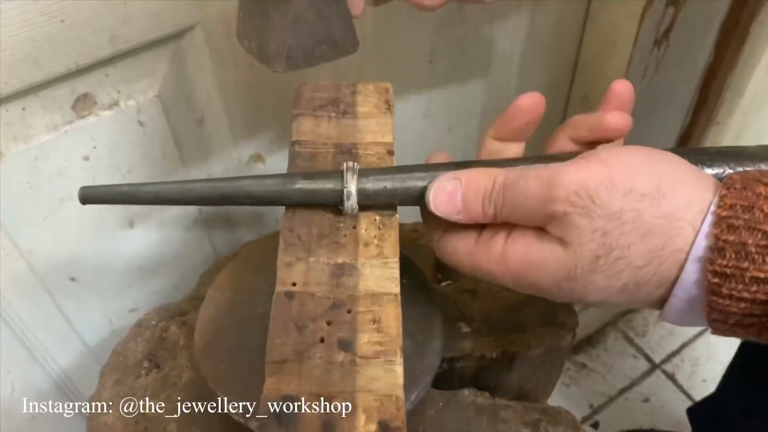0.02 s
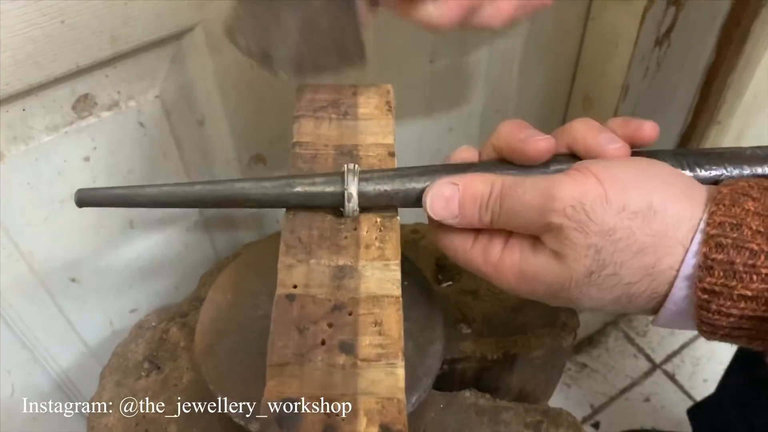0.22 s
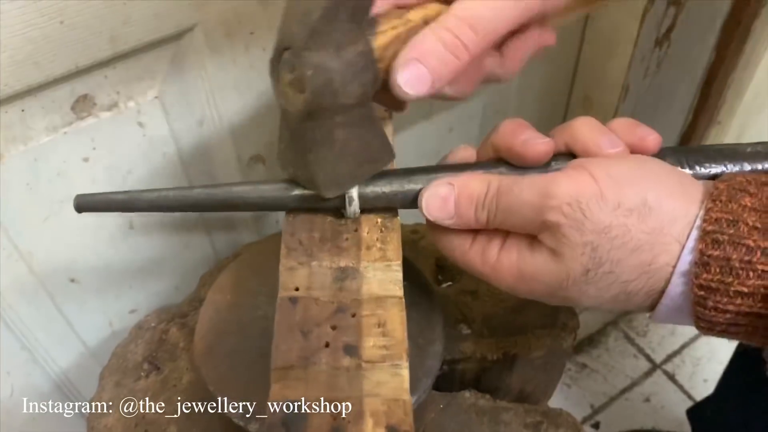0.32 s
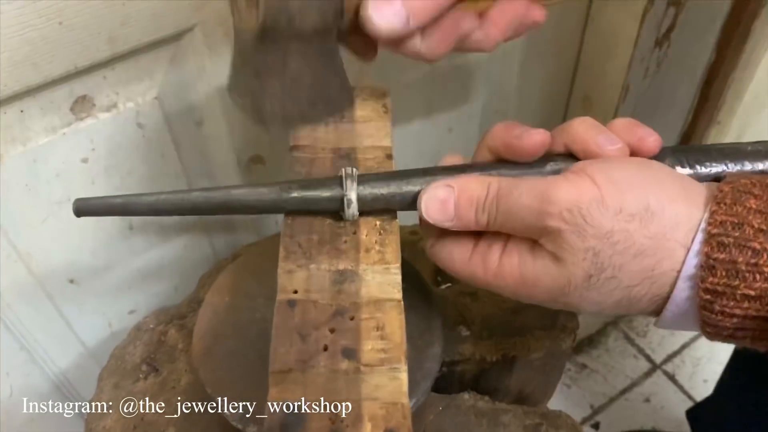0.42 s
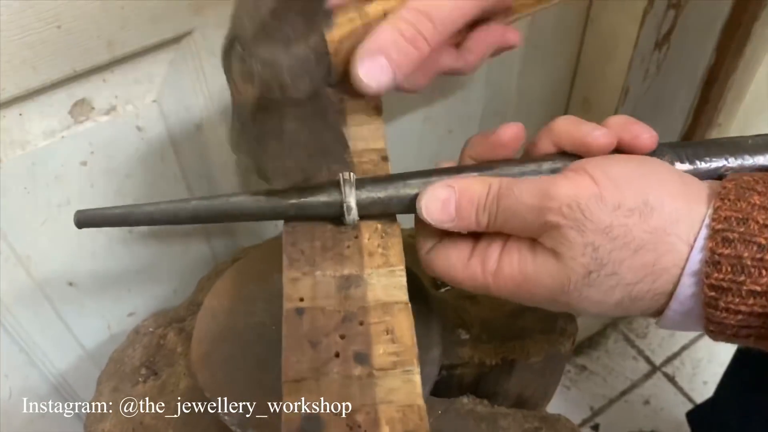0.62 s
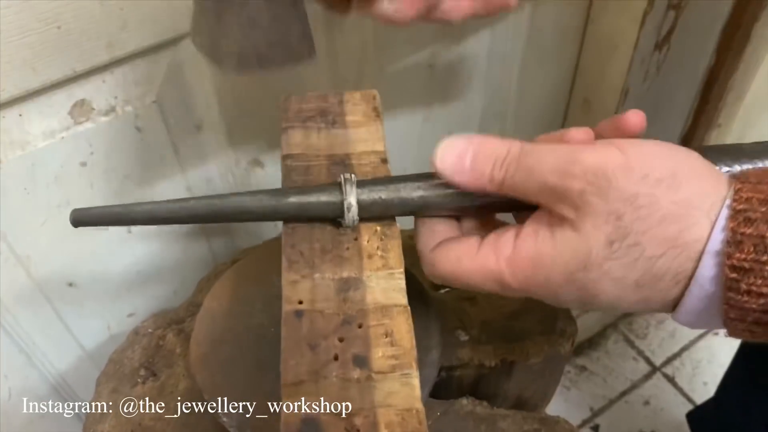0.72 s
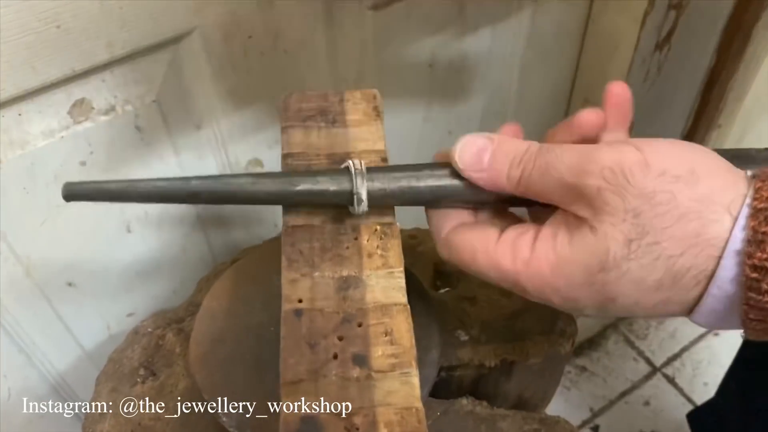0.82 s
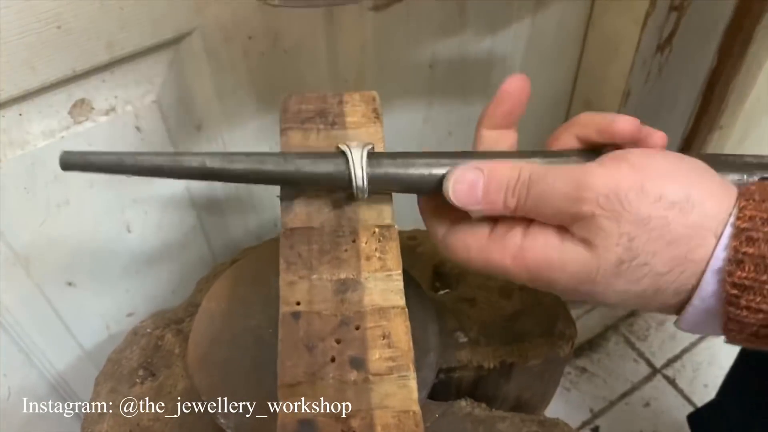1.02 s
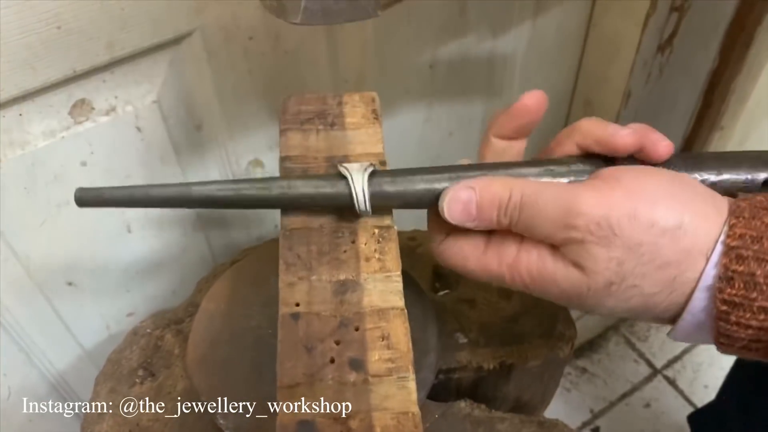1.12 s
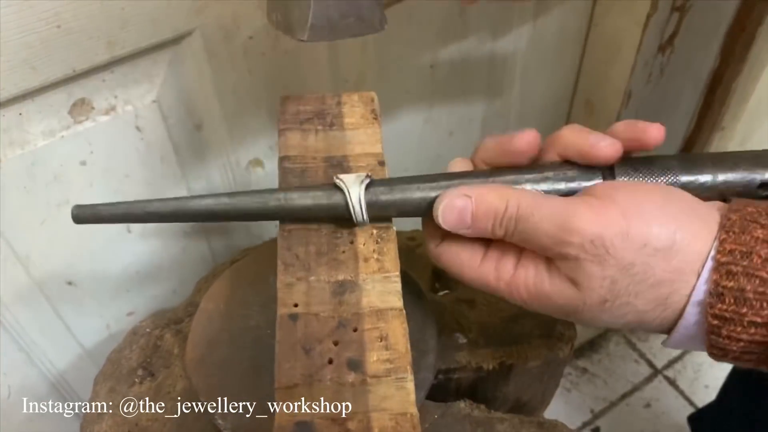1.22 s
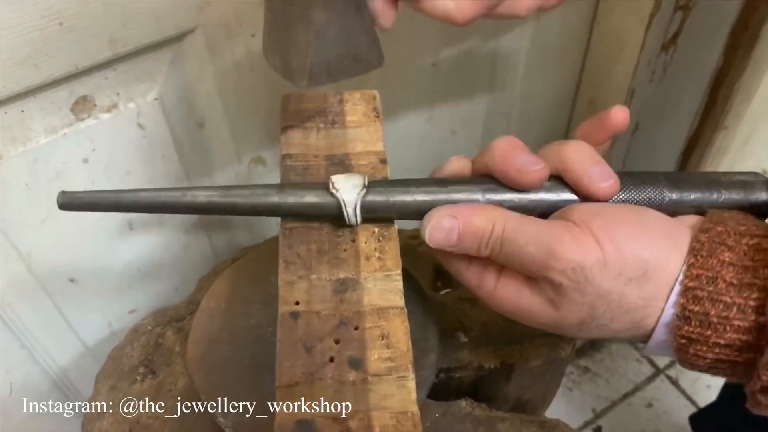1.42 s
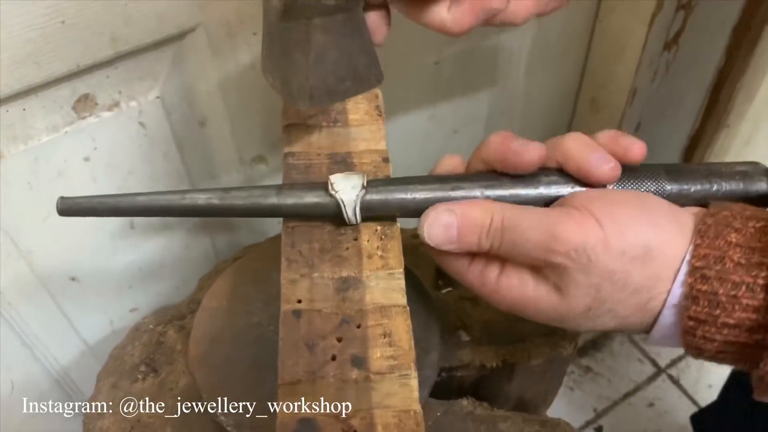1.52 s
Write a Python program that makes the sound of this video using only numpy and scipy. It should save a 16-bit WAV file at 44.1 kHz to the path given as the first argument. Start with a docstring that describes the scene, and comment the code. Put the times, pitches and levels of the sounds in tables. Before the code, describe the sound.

A hammer cracks twice on a steel ring mandrel, followed by dull wooden knocks and rubs

```python
"""A small workshop, heard close in the stereo sound of a phone: a steel hammer strikes a ring on a steel mandrel
that rests on a wooden bench peg. Two blows, the first with a weaker second contact, each sum a noise crack,
decaying steel tones, a peg knock of sinking pitch, a bench boom and a diffuse noise tail of the room.
Then the mandrel is turned and set down: soft knocks of thud, ring and rattle, and dull rubs of shaped noise.
A hand rustles faintly near the end; a low, gently swaying noise of the room runs throughout."""
import sys
import numpy as np
from scipy import signal
from scipy.fft import rfft, irfft, next_fast_len
from scipy.io import wavfile
from scipy.ndimage import map_coordinates

SR = 44100
rng = np.random.default_rng(int(sys.argv[2]) if len(sys.argv) > 2 else 0)


def transcribe(u):
    """Save the signal u as a 16-bit wav file named by the first command-line argument.

    u: samples, shape (n,) or (channels, n), limited to [-1, 1]; the rate is SR.
    q: integer samples, one column per channel.
    """
    v = np.clip(np.atleast_2d(u).T, -1, 1)
    q = np.round(v * 32767).astype(np.int16)
    wavfile.write(sys.argv[1], SR, q)


N = 68355
T = np.arange(int(.9 * SR)) / SR  # time within one sound event [s]


def amp(db):
    """Decibels to gain."""
    return 10 ** (np.asarray(db) / 20)


def along(points, hz):
    """Read (frequency, value) points at hz, in straight lines on a log-frequency axis."""
    point_hz, values = np.transpose(points)
    return np.interp(np.log(hz + 1), np.log(point_hz + 1), values)


def decay(t60, time):
    """Exponential decay by 60 dB in t60 seconds."""
    return np.exp(-np.log(1000) * time / t60)


def rise(rise_s):
    """Exponential approach to 1 with time constant rise_s."""
    return 1 - np.exp(-T / rise_s)


def fade(t60, rise_s):
    """Envelope of a struck body: a quick rise times an exponential decay."""
    return decay(t60, T) * rise(rise_s)


def add(out, start_s, sound):
    """Mix sound into out from start_s, cut at the end of the scene."""
    i = round(start_s * SR)
    out[:, i:i + sound.shape[-1]] += sound[..., :N - i]


def wobble(rate, size):
    """A smooth random curve through rate random knots a second."""
    knots = rng.standard_normal(1024)
    return map_coordinates(knots, [np.arange(size) * rate / SR + 2], mode="wrap")


def filtered(x, response):
    """Multiply the spectrum of x by a complex response of frequency."""
    n = x.shape[-1]
    padded = next_fast_len(n + 8192)
    hz = np.fft.rfftfreq(padded, 1 / SR)
    return irfft(rfft(x, padded) * response(hz), padded)[..., :n]


# Likeness of the two channels: (frequency [Hz], left-right correlation [-1 to 1])
CHANNEL_LIKENESS = [(100, .96), (300, 0.63), (500, 0.78), (1000, 0.53), (1400, -0.42), (2300, 0.13),
                    (4000, -0.081), (6000, 0.057), (8000, 1), (15000, 1)]


def spread(hz):
    """Mid and side shares that give the channels their likeness at each frequency."""
    turn = np.arccos(np.clip(along(CHANNEL_LIKENESS, hz), -1, 1)) / 2
    return np.array([np.cos(turn), np.sin(turn)])


def left_right(mid, side):
    """Sum and difference of mid and side make the left and right channels."""
    return np.array([mid + side, mid - side])


def noise(spectrum, size):
    """Stereo noise coloured by a spectrum and scaled to rms 1 over both channels."""
    white = rng.standard_normal((2, size))
    mid, side = filtered(white, lambda hz: amp(along(spectrum, hz)) * spread(hz))
    pair = left_right(mid, side)
    return pair / pair.std()


# Colour of the room noise: (frequency [Hz], relative level [dB per Hz])
FLOOR_COLOUR = [(25, -17), (50, -15.5), (72, -6), (100, 3.5), (140, -11.5), (190, -4), (245, -20.5),
                (320, -16.5), (500, -25.5), (850, -21), (1500, -25.5), (4000, -29.5), (8700, -31.5),
                (10000, -37), (12000, -43), (14000, -39.5), (16000, -52.5)]
FLOOR_DB, FLOOR_SWAY_DB = -68, 3.5  # the sway scales a random curve


def background():
    """Low rush of the workshop: coloured noise whose level sways at random."""
    level_db = FLOOR_DB + FLOOR_SWAY_DB * wobble(8, N)
    return amp(level_db) * noise(FLOOR_COLOUR, N)


RIPPLE_DB, RIPPLE_HZ = 2, 68  # countless weak resonances: size of the ripple, spacing of its knots


def uneven(x, tilt_db):
    """Ripple the spectrum of x at random and tilt it by tilt_db per octave about 2 kHz."""
    knots = rng.standard_normal(2048)

    def response(hz):
        ripple = map_coordinates(knots, [hz / RIPPLE_HZ], mode="wrap")
        octaves = np.log2(np.maximum(hz, 500) / 2000)  # the tilt levels off below 500 Hz
        return amp(RIPPLE_DB * ripple + tilt_db * octaves)
    return filtered(x, response)


# Colour of the contact: (frequency [Hz], relative level [dB per Hz])
CRACK_COLOUR = [(50, -48), (150, -29), (400, -5.5), (950, 3), (1400, -4), (2200, 1.5), (3000, -10.5),
                (4200, -1.5), (5200, -12), (7500, -8.5), (9500, -4.5), (11500, -1), (14500, -8),
                (16000, -16.5)]
CRACK_DB, CRACK_T60 = -13, .03  # [dB], [s]
CONTACT_RISE_S = .0008  # shared by the crack and the steel


def crack(hold_s):
    """The contact itself: a noise burst held while the ring chatters on the steel, then dying."""
    burst = rise(CONTACT_RISE_S) * decay(CRACK_T60, np.maximum(T - hold_s, 0))
    return amp(CRACK_DB) * burst * uneven(noise(CRACK_COLOUR, len(T)), 0)


# Modes of mandrel, ring and hammer head: (frequency [Hz], level struck at spot 0 [dB],
# level struck at spot 1 [dB], level laid on the peg [dB], t60 before any stretch [s])
STEEL_MODES = [(743, -34, -27, -38, .32), (820, -27, -21, -38, .2), (968, -30, -26, -34, .14),
               (1069, -30, -30, -35, .11), (1615, -37, -29, -31, .25), (1777, -27, -30, -45, .13),
               (2115, -33, -28, -33, .19), (2508, -33, -33, -60, .17), (2294, -25, -37, -48, .21),
               (2360, -31, -29, -48, .25), (4133, -37, -30, -70, .22), (4230, -26, -31, -70, .27),
               (6620, -35, -38, -90, .23), (9612, -27, -37, -90, .17), (12862, -41, -33, -90, .12)]
ROOM_SCATTER, SCATTER_RATE = .55, 100  # share of blur in each tone, blur knots per second
BITE_DB, BITE_T60 = 6, .045  # the ringing is strongest while the hammer still presses


def steel(contact, stretch):
    """Decaying modes for contact 0, 1 (struck) or 2 (laid down), each randomly blurred by the room."""
    out = np.zeros((2, len(T)))
    bite = amp(BITE_DB) * fade(BITE_T60, CONTACT_RISE_S)
    direct = np.array([[1], [1j]])  # the side is a quarter cycle from the mid
    for hz, *levels_db, t60 in STEEL_MODES:
        blur = np.array([wobble(SCATTER_RATE, len(T)) + 1j * wobble(SCATTER_RATE, len(T)) for _ in range(2)])
        mid, side = spread(hz)[:, None] * (direct + ROOM_SCATTER * blur)
        envelope = fade(t60 * stretch, CONTACT_RISE_S) + bite
        tone = np.exp(2j * np.pi * hz * T) * envelope
        out += amp(levels_db[contact]) * np.imag(left_right(mid, side) * tone)
    return out


# The workshop's answer: (frequency [Hz], relative level [dB per Hz])
ROOM_COLOUR = [(40, -27), (100, -4.5), (300, -0.5), (520, -2), (850, 3), (1300, 0.5), (1900, -6),
               (2350, -3), (3000, -17), (3700, -10.5), (4250, -6.5), (4900, -16), (6600, -10.5),
               (7500, -14.5), (9500, -15.5), (12000, -19.5), (14500, -18.5), (16000, -40.5)]
# Decay of that answer: (frequency [Hz], t60 [s])
ROOM_DECAY = [(100, 0.88), (300, 0.21), (800, 0.24), (2000, .24), (4300, .27), (6500, 0.19), (9500, .2),
              (14000, 0.16)]
ROOM_SWELL_CYCLES = 0.44  # low notes take longer to build up in the room
ROOM_RISE_S = .005


def room(tilt_db):
    """Diffuse tail: noise in which each frequency builds up and dies at its own speed."""
    source = uneven(noise(ROOM_COLOUR, len(T)), tilt_db)
    hz, frame_s, bins = signal.stft(source, SR, nperseg=256)
    half_bin = hz[1] / 2  # lets the lowest bin swell too
    swell = 1 - np.exp(-frame_s * (hz[:, None] + half_bin) / ROOM_SWELL_CYCLES)
    dying = decay(along(ROOM_DECAY, hz)[:, None], frame_s)
    tail = signal.istft(bins * swell * dying, SR, nperseg=256)[1]
    return tail[:, :len(T)] * rise(ROOM_RISE_S)


PEG_HZ, PEG_T60, PEG_RISE_S = 275.4, 0.019, 0.0012
PEG_SAG, PEG_SAG_S = 0.34, .003  # share by which the knock starts higher, and time in which it sinks


def peg():
    """One short wooden knock: a decaying sine that sinks in pitch."""
    hz = PEG_HZ * (1 + PEG_SAG * np.exp(-T / PEG_SAG_S))
    return np.sin(2 * np.pi * np.cumsum(hz) / SR) * fade(PEG_T60, PEG_RISE_S)


# Modes of bench and floor: (frequency [Hz], mean level [dB], t60 [s])
BENCH_MODES = [(88.36, -39, .5), (104.2, -30, 0.35), (133.6, -38, .42), (183.3, -30.5, 0.41),
               (198.4, -30.5, .33), (261.4, -36.5, .25)]
BENCH_RISE_S = 0.015


def bench():
    """Slow low boom: decaying modes with random phases and slightly random levels."""
    boom = np.zeros(len(T))
    for hz, db, t60 in BENCH_MODES:
        tone = np.sin(2 * np.pi * (hz * T + rng.random()))
        boom += amp(db + rng.normal(0, 1)) * tone * fade(t60, BENCH_RISE_S)
    return boom * rise(BENCH_RISE_S)  # a second rise softens the start


# Hammer contacts: (time [s], level [dB], time the ring chatters on the steel [s], striking spot [0 or 1],
# peg and bench level relative to the contact [dB], tail level [dB], tail tilt [dB per octave])
HAMMER_CONTACTS = [(0.2483, 0, 0.0075, 0, 0.5, -1, -0.5), (0.2697, -10, .002, 0, -10, -4, 0),
                   (0.4799, 1, .0025, 1, -1, 0, -0.35)]
STEEL_DB, ROOM_DB, PEG_DB, BENCH_DB = -4, -22, -8.5, 1
PEG_DELAY_S, BENCH_DELAY_S = .0015, .006


def hammer():
    """Each contact cracks and rings the steel, stirs the room, then knocks the peg and booms the bench."""
    out = np.zeros((2, N))
    for start_s, db, chatter_s, spot, wood_db, tail_db, tilt_db in HAMMER_CONTACTS:
        ringing = amp(STEEL_DB) * steel(spot, 1)
        tail = amp(ROOM_DB + tail_db) * room(tilt_db)
        add(out, start_s, amp(db) * (crack(chatter_s) + ringing + tail))
        add(out, start_s + PEG_DELAY_S, amp(db + wood_db + PEG_DB) * peg())
        add(out, start_s + BENCH_DELAY_S, amp(db + wood_db + BENCH_DB) * bench())
    return out


# The mandrel settling on the peg: (time [s], thud level [dB], steel ring level [dB],
# wooden rattle level [dB], bench level [dB])
KNOCK_EVENTS = [(.528, -34, -18.5, -34.5, -17), (0.7624, -52.5, -48, -53, -37),
                (1.0514, -40.5, -46, -43.5, -28), (1.0832, -33, -28.5, -42.5, -26)]
# Colour of the wooden rattle: (frequency [Hz], relative level [dB per Hz])
RATTLE_COLOUR = [(50, -35), (120, 10.5), (220, -5.5), (380, 9), (600, -4), (950, 2.5), (1250, -11),
                 (1500, -9), (2200, -33.5), (3000, -49), (8000, -76)]
THUD_HZ, THUD_T60, THUD_RISE_S, THUD_TOP_HZ = 720, .009, 0.00089, 2260
RATTLE_T60, RATTLE_RISE_S = 0.14, 0.00077
KNOCK_RING_STRETCH = 1.25  # factor on the steel's t60


def handling():
    """Steel set down on wood: a low-passed sine thud, a faint ring, a noise rattle and a little boom."""
    out = np.zeros((2, N))
    low_pass = signal.butter(4, THUD_TOP_HZ, fs=SR, output="sos")
    for start_s, thud_db, ring_db, rattle_db, bench_db in KNOCK_EVENTS:
        thud = np.sin(2 * np.pi * THUD_HZ * T) * fade(THUD_T60, THUD_RISE_S)
        thud = signal.sosfilt(low_pass, thud)
        thud /= np.abs(thud).max()
        rattle = noise(RATTLE_COLOUR, len(T)) * fade(RATTLE_T60, RATTLE_RISE_S)
        knock = amp(thud_db) * thud + amp(rattle_db) * rattle
        knock = knock + amp(ring_db) * steel(2, KNOCK_RING_STRETCH) + amp(bench_db) * bench()
        add(out, start_s, knock)
    return out


# The mandrel shifting on the peg: (time [s], length [s], mean level [dB], bench level [dB])
SCUFF_EVENTS = [(0.619, 0.042, -56.5, -33), (0.791, 0.035, -60, -35), (1.159, 0.076, -52.5, -26),
                (1.252, 0.0407, -71, -36)]
# Colour of the rubbing: (frequency [Hz], relative level [dB per Hz])
SCUFF_COLOUR = [(50, -30), (120, 8), (230, -5), (390, 11.5), (520, -1), (800, 2.5), (1050, -10.5),
                (1400, -24), (2200, -25), (3000, -68), (8000, -53)]


def scuffs():
    """Dull rubs of the mandrel on wood: half-sine swells of flickering noise that stir the bench midway."""
    out = np.zeros((2, N))
    for start_s, length_s, db, bench_db in SCUFF_EVENTS:
        stroke = np.sin(np.pi * np.minimum(T / length_s, 1))
        level_db = db + 1.2 * wobble(190, len(T))
        add(out, start_s, amp(level_db) * stroke * noise(SCUFF_COLOUR, len(T)))
        add(out, start_s + length_s / 2, amp(bench_db) * bench())
    return out


# Colour of skin and sleeve: (frequency [Hz], relative level [dB per Hz])
RUSTLE_COLOUR = [(100, -18), (350, 14), (1000, -15), (2500, -11), (4500, 5.5), (7000, -11), (11000, -3.5),
                 (14000, -5.5), (16000, -22)]
RUSTLE_S, RUSTLE_WIDTH_S, RUSTLE_DB = 1.433, 0.035, -78  # centre, standard deviation, peak gain


def rustle():
    """The hand moves on the steel: a faint bell-shaped swell of noise."""
    offset = (np.arange(N) / SR - RUSTLE_S) / RUSTLE_WIDTH_S
    return amp(RUSTLE_DB) * np.exp(-offset ** 2 / 2) * noise(RUSTLE_COLOUR, N)


def scene():
    """Room noise, blows, handling, rubs and rustle together."""
    return background() + hammer() + handling() + scuffs() + rustle()


# Balance of the stereo sound: (frequency [Hz], left minus right [dB])
STEREO_BALANCE = [(100, 0.5), (230, -0.5), (520, 3), (800, 3), (1200, -1.2), (2400, 0), (4400, -3),
                  (8000, 0)]
TREBLE_LAG_S, LAG_FROM_HZ, LAG_KNEE_HZ = .000211, 4740, 300  # the treble comes later at the left
BASS_LAG_S, BASS_LAG_HZ = 0.0073, 199.7  # the bass arrives a little after the crack
LOW_CUT_HZ, TOP_HZ = 55, 16300


def record(dry):
    """The phone's stereo sound: tilted balance, later bass, later treble at the left, limited band."""
    def response(hz):
        # each phase is the integral of its delay over frequency
        treble_cycles = TREBLE_LAG_S * LAG_KNEE_HZ * np.logaddexp(0, (hz - LAG_FROM_HZ) / LAG_KNEE_HZ)
        bass_cycles = BASS_LAG_S * BASS_LAG_HZ * np.arctan(hz / BASS_LAG_HZ)
        left_lag = np.exp(-2j * np.pi * treble_cycles)
        late_bass = np.exp(-2j * np.pi * bass_cycles)
        tilt = amp(along(STEREO_BALANCE, hz) / 2)
        s = 1j * hz / LOW_CUT_HZ
        low_cut = s * s / (s * s + s + 1)
        high_cut = 1 / np.sqrt(1 + (hz / TOP_HZ) ** 160)
        return np.array([tilt * left_lag, 1 / tilt]) * late_bass * low_cut * high_cut
    return filtered(dry, response)


dry = scene()
out = record(dry)
transcribe(out)
```